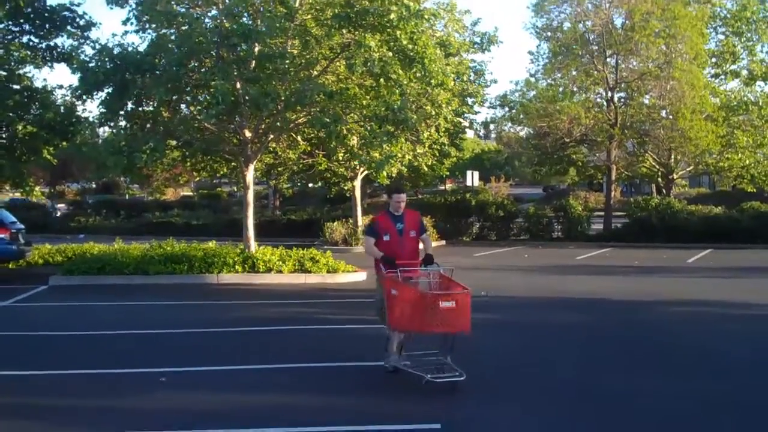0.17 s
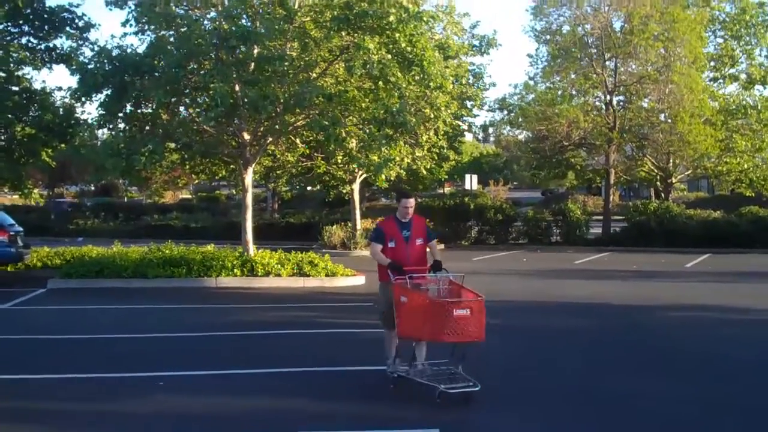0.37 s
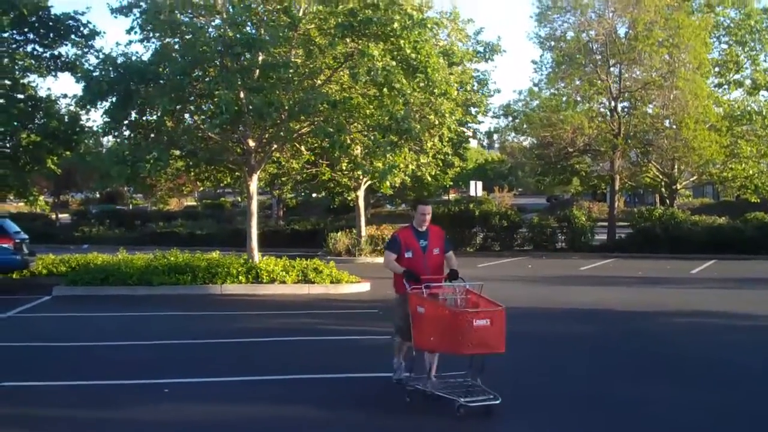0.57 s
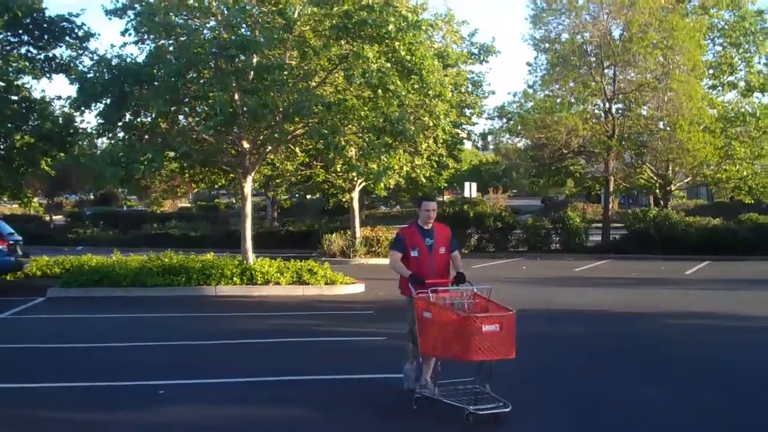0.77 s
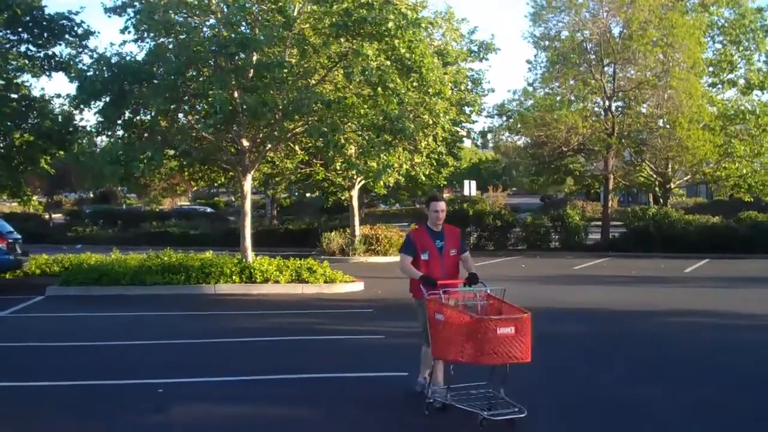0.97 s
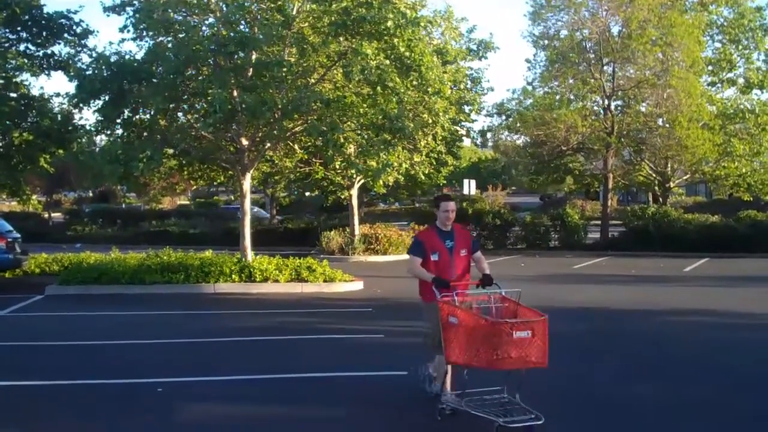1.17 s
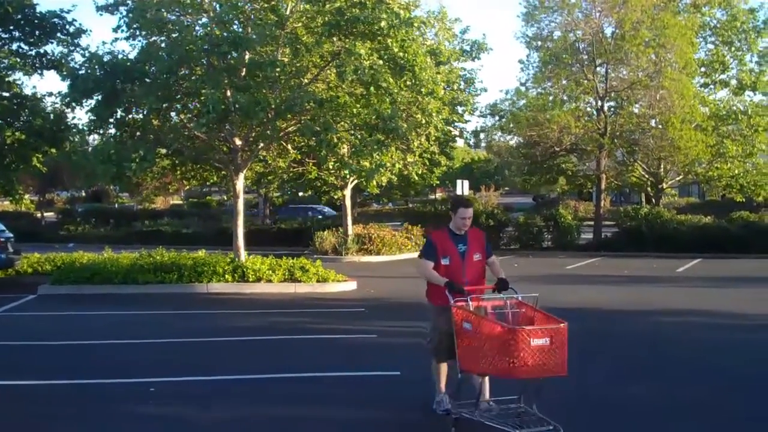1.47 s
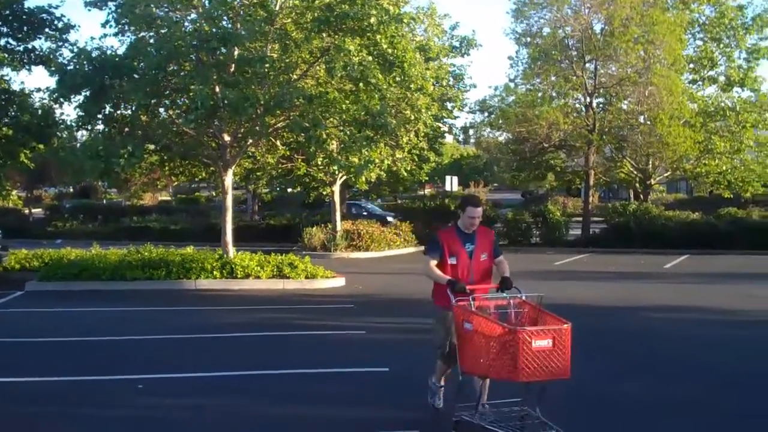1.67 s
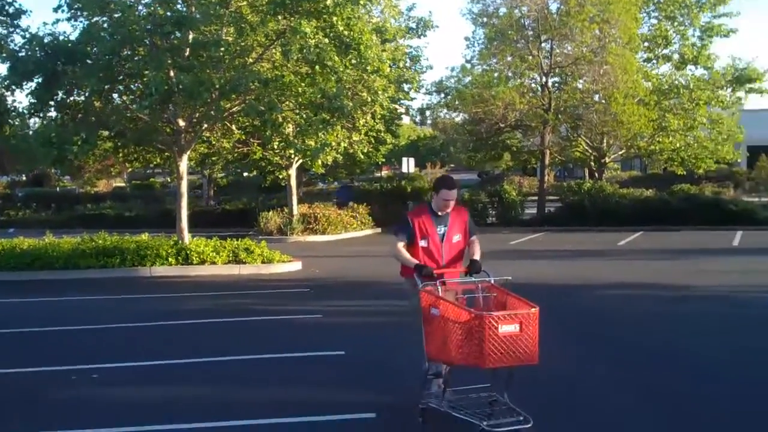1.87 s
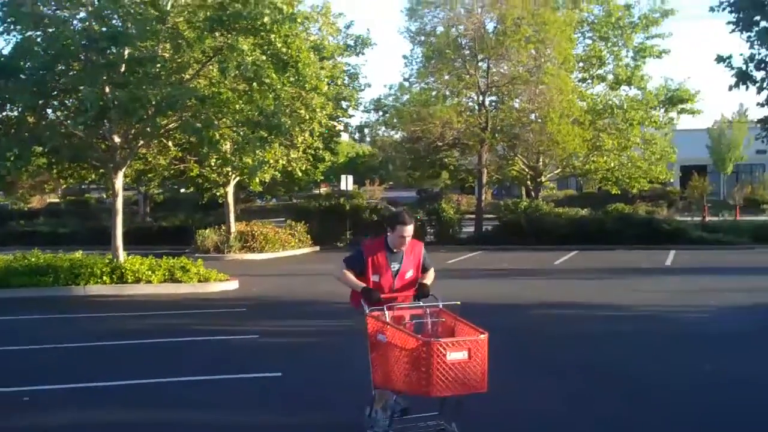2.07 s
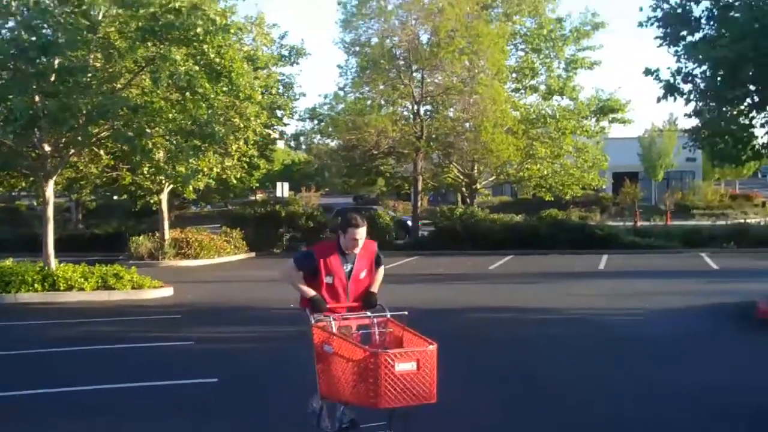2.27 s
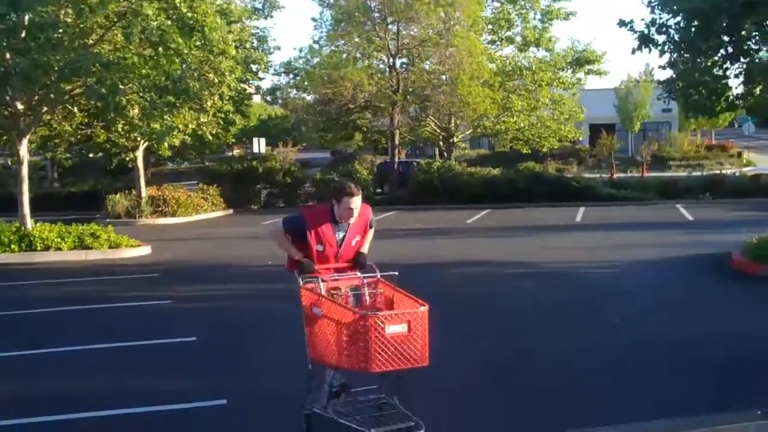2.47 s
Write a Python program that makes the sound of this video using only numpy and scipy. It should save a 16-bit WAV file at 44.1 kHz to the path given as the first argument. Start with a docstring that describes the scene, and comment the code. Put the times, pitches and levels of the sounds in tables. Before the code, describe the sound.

A shopping cart rolls over coarse asphalt in an open parking lot, a few metres away, its loose metal frame rattling throughout in dense, irregular bright bursts, about 25 to 30 jolts a second. Wheels drone over low distant traffic. A faint wavering engine hum dies by 1.3 s. Small high pings follow from 1.2 s, a sharp snap at 1.7 s, and a hollow wheel roar swells, peaking near 2.2 s.

```python
"""A shopping cart rolls over coarse asphalt in an open parking lot, a few metres away.
Throughout, traffic rumbles and the hard wheels drone (coloured noise), and bumps jolt the loose wire
frame into bursts of tiny clashes (short random rings, frame modes, one clear ring and tick per bump).
A wavering engine hum (sine) comes and goes, then dies away by 1.3 s; dry snaps (blips) start at 0.1 s.
From 1.2 s small bright pings join and a hollow wheel roar (noise) swells, strongest near 2.2 s."""
import sys
import numpy as np
from scipy import signal
from scipy.fft import rfft, irfft
from scipy.io import wavfile
from scipy.ndimage import uniform_filter1d

SR = 44100
rng = np.random.default_rng(int(sys.argv[2]) if len(sys.argv) > 2 else 0)


def wrap_up_sound(samples):
    """Save the sound to the file named by the first command line argument, as 16-bit audio."""
    columns = np.atleast_2d(samples).T
    # keep every value between -1 and 1, then stretch to whole-number steps
    tamed = np.clip(columns, -1, 1)
    steps = np.round(tamed * 32767).astype(np.int16)
    wavfile.write(sys.argv[1], SR, steps)


def rack_gain(trim_db):
    """Turn a fader trim in dB into the linear factor to multiply a signal by."""
    fader = np.asarray(trim_db, float)
    return 10 ** (fader / 20)


N = 115983

# bumps that shake the frame: t/s, shaking level/dB, f of the wire that rings most/Hz, hold/s, decay t60/s
JOLTS = [(0.0004, -33, 3630, 0.03, 0.31), (0.021, -23.5, 2900, 0, 0.057), (0.0661, -31.5, 5100, 0, 0.036),
         (0.1, -30, 4600, 0.0055, 0.15), (0.1402, -32.5, 4800, 0, 0.23), (0.1813, -33, 5310, 0.0, 0.027),
         (0.207, -34, 4600, 0.0052, 0.033), (0.2218, -26, 5480, 0.0, 0.21),
         (0.2415, -29.5, 3770, 0.006, 0.036), (0.274, -35, 5340, 0.0067, 0.103),
         (0.2936, -29.5, 3500, 0.0035, 0.15), (0.3271, -36, 2780, 0.013, 0.4),
         (0.3693, -29.5, 3640, 0.0044, 0.11), (0.3947, -29.5, 3330, 0.007, 0.026),
         (0.4125, -28, 3520, 0.0041, 0.15), (0.4503, -27.5, 3700, 0.0026, 0.18),
         (0.473, -34.5, 3610, 0.027, 0.124), (0.497, -32.5, 3550, 0.025, 0.085),
         (0.5773, -30.0, 3830, 0.014, 0.054), (0.6203, -29.5, 3440, 0.0029, 0.29),
         (0.6652, -32.0, 3680, 0.003, 0.051), (0.7026, -36.5, 2630, 0.021, 0.382),
         (0.7413, -31, 4900, 0.0, 0.11), (0.7731, -31.5, 3640, 0.0018, 0.55), (0.8119, -26, 3780, 0, 0.075),
         (0.8384, -23.5, 3530, 0.0017, 0.11), (0.858, -32, 3410, 0.0052, 0.12),
         (0.8767, -28.5, 3650, 0, 0.049), (0.933, -28, 3180, 0.0031, 0.068),
         (0.9524, -26.5, 3530, 0.00027, 0.22), (0.9893, -39, 3360, 0.0, 0.035),
         (1.0257, -26, 3630, 0.0094, 0.067), (1.041, -28.5, 3600, 0.019, 0.084),
         (1.0825, -40, 4500, 0.0036, 0.029), (1.131, -25.5, 3630, 0, 0.14),
         (1.1752, -24.5, 3750, 0.0, 0.13), (1.2118, -31.5, 2930, 0.004, 0.068),
         (1.237, -33, 3080, 0.008, 0.105), (1.2645, -26.5, 3750, 0.0066, 0.15),
         (1.3246, -30.5, 5010, 0.0044, 0.068), (1.342, -29, 3770, 0.000017, 0.1),
         (1.3723, -32, 3940, 0.0, 0.24), (1.4131, -25, 5150, 0.00027, 0.02),
         (1.4245, -26, 2740, 0.0, 0.024), (1.4646, -30, 5040, 0.00061, 0.034),
         (1.49, -29.5, 5490, 0.0012, 0.2), (1.5184, -27, 3980, 0.0029, 0.021),
         (1.5322, -26.5, 3570, 0.0028, 0.13), (1.569, -33.5, 2570, 0.0039, 0.13),
         (1.5975, -34, 2500, 0.019, 0.19), (1.646, -32.5, 5270, 0.0028, 0.2),
         (1.6865, -28.5, 2600, 0, 0.22), (1.743, -25.5, 5850, 0, 0.14), (1.7797, -28.5, 3090, 0.0041, 0.16),
         (1.813, -34.0, 4000, 0.0099, 0.042), (1.8476, -32.5, 6400, 0.021, 0.1),
         (1.8625, -22.5, 2410, 0.00089, 0.15), (1.922, -36.5, 3460, 0.0028, 0.028),
         (1.983, -36.5, 2320, 0.014, 0.11), (2.03, -35.5, 2520, 0.015, 0.131),
         (2.051, -32.5, 3900, 0, 0.29), (2.0885, -31.5, 4170, 0.0096, 0.059),
         (2.1126, -32.5, 3530, 0.0071, 0.19), (2.166, -35.5, 4320, 0.034, 0.039),
         (2.198, -31.5, 2500, 0.0, 0.03), (2.2151, -36, 2800, 0.0012, 0.15),
         (2.235, -33.5, 3110, 0.016, 0.031), (2.28, -36.5, 4400, 0.001, 0.11),
         (2.301, -27.5, 4020, 0.008, 0.068), (2.3502, -29.5, 3180, 0.0, 0.046),
         (2.401, -35, 2870, 0.0028, 0.037), (2.519, -30.5, 5420, 0.0063, 0.13),
         (2.542, -37.5, 3740, 0.027, 0.034), (2.5831, -34.5, 5340, 0.0069, 0.13)]
JOLT_RISE_S = 0.0026


def evened(x):
    """Scales to unit rms."""
    return x / np.sqrt(np.mean(x ** 2) + 1e-20)


def curve(rows):
    """Amplitude over time from (t/s, level/dB) rows."""
    s, db = np.transpose(rows)
    return rack_gain(np.interp(np.arange(N) / SR, s, db))


def coloured(x, points, power=1):
    """Filters by (f/Hz, gain/dB) rows, interpolated over log f; power scales the dB."""
    f, db = np.transpose(points)
    hz = np.fft.rfftfreq(x.shape[-1], 1 / SR)
    gain_db = power * np.interp(np.log(hz + 1), np.log(f + 1), db)
    return irfft(rfft(x) * rack_gain(gain_db), x.shape[-1])


def add(mix, s, sound):
    """Adds sound into mix in place from time s, cut at the end."""
    part = mix[max(round(s * SR), 0):][:len(sound)]
    part += sound[:len(part)]


def ring(hz, t60, size=3000):
    """Exponentially decaying sine, as of one struck mode."""
    t = np.arange(size) / SR
    return rack_gain(-60 * t / max(t60, 1e-3)) * np.sin(2 * np.pi * hz * t)


def noise_layer(level, band):
    """Two unrelated draws of coloured noise (centre and spread) under one level curve."""
    return curve(level) * evened(coloured(rng.standard_normal((2, N)), band))


def traffic_rumble():
    """Distant traffic: mostly low noise with a slowly drifting level."""
    # t/s, level/dB
    rumble_level = [(0.0, -39), (0.59, -39.5), (0.75, -38), (1.11, -42.5), (1.13, -39), (1.6, -41.5),
                    (1.94, -41), (1.98, -44), (2.03, -41.5), (2.63, -42.5)]
    # f/Hz, density/dB
    traffic_band = [(15, -23), (30, -10.5), (50, -10), (70, 1), (82, -3), (130, -5), (200, -2.5),
                    (240, -6.5), (262, -2), (300, -13), (400, -13.5), (550, -20), (1500, -47), (14000, -90)]
    return noise_layer(rumble_level, traffic_band)


def engine_hum():
    """Engine tone: a sine whose pitch wavers at random, slower than 6 Hz."""
    # t/s, rms level/dB
    hum_level = [(0, -40), (.36, -38.5), (.46, -43), (.58, -60), (.69, -58), (.74, -43), (.8, -54),
                 (.87, -43), (.95, -58), (1.23, -48), (1.32, -75), (2.63, -80)]
    centre_hz, waver_rms_hz = 113, .8
    hz = np.fft.rfftfreq(N, 1 / SR)
    waver = irfft(rfft(rng.standard_normal(N)) * (hz < 6), N)
    pitch_hz = centre_hz + waver_rms_hz * evened(waver)
    return np.sqrt(2) * curve(hum_level) * np.sin(2 * np.pi * np.cumsum(pitch_hz) / SR)


def wheel_drone():
    """Hard wheels on asphalt: broad mid-range noise."""
    # t/s, level/dB
    drone_level = [(0.0, -45), (0.02, -41), (0.64, -41.5), (1.08, -38), (1.11, -39.5), (1.71, -40),
                   (2.02, -35.5), (2.13, -40), (2.15, -36.5), (2.55, -39), (2.62, -42), (2.63, -33)]
    # f/Hz, density/dB
    tread_band = [(250, -8), (400, -7), (560, -8), (660, -2), (730, -4.5), (1000, 2.5), (1250, -2),
                  (1700, -1), (2500, -7.5), (5000, -26), (9000, -40), (14000, -70)]
    return noise_layer(drone_level, tread_band)


def hollow_roar():
    """Hollow roar of the nearing wheels: noise with peaks and dips, 400-950 Hz."""
    # t/s, level/dB
    roar_level = [(1.2, -56.5), (1.7, -52.5), (2.0, -45), (2.2, -36), (2.28, -38), (2.36, -40.5),
                  (2.63, -39.5)]
    # f/Hz, density/dB
    roar_band = [(200, -19), (400, -2.5), (560, -7.5), (650, 3), (730, -8.5), (830, 2.5), (950, -1.5),
                 (1150, -7.5), (1600, -16), (6000, -42), (14000, -80)]
    return noise_layer([(0, -65)] + list(roar_level), roar_band)


def blip(hz, t, width_s):
    """Cosine under a Gaussian."""
    return np.exp(-(t / width_s) ** 2) * np.cos(2 * np.pi * hz * t)


def snaps():
    """Very short dry clicks: a low blip with a shorter, brighter one slightly first."""
    # t/s, level/dB, low f/Hz, high f/Hz, left minus right/dB
    snap_rows = [(.1012, -18, 4700, 8000, 1), (.1828, -18.5, 5000, 8500, 1), (.2102, -21, 4600, 8000, 1),
                 (1.7252, -9.5, 3700, 7600, -4), (2.2528, -19, 3200, 6000, 1),
                 (2.3218, -15.5, 3600, 6500, 1), (2.4086, -20, 2900, 6000, 1)]
    width_s, high_db, lead_s = .0003, -6, .00045
    out, t = np.zeros((2, N)), np.arange(-100, 100) / SR
    for s, db, low_hz, high_hz, pan_db in snap_rows:
        click = blip(low_hz, t, width_s)
        click = click + rack_gain(high_db) * blip(high_hz, t + lead_s, width_s / 3)
        for side, sign in enumerate((.5, -.5)):
            add(out[side], s + t[0], rack_gain(db + sign * pan_db) * click)
    return out


def rings():
    """Each bump ticks and rings one wire clearly; a few small high pings join."""
    # t/s, level/dB, f/Hz, t60/s
    ping_rows = [(1.1972, -27, 10300, 0.014), (1.3548, -22.5, 10800, 0.017), (1.7679, -34, 10900, 0.024),
                 (2.1011, -27.5, 11000, 0.02)]
    ring_db, ring_t60_s = -3, 0.05
    tick_db, tick_t60_s = 1.5, 0.0038  # first contact
    out, rise = np.zeros(N), np.minimum(np.arange(3000) / SR / JOLT_RISE_S, 1)
    for s, db, hz, hold_s, t60_s in JOLTS:
        add(out, s, rack_gain(db + ring_db) * ring(hz, ring_t60_s) * rise)
        add(out, s + JOLT_RISE_S / 2, rack_gain(db + tick_db) * ring(hz, tick_t60_s))
    for s, db, hz, t60_s in ping_rows:
        add(out, s, rack_gain(db) * ring(hz, t60_s) * rise)
    return out


def shaking():
    """How hard the frame shakes: chatter plus rise, hold and decay of every bump, in uneven clumps."""
    # chatter between bumps: t/s, level/dB
    jitter_level = [(0.0, -39), (0.29, -40), (0.58, -38.5), (0.88, -36.6), (1.17, -40.5), (1.46, -37.5),
                    (1.75, -43), (2.05, -43.5), (2.34, -39.5), (2.63, -40.5)]
    clump_db, clump_s = 1.7, 0.0021
    power, t = curve(jitter_level) ** 2, np.arange(SR // 3) / SR
    for s, db, hz, hold_s, t60_s in JOLTS:
        fall_db = -60 * np.maximum(t - JOLT_RISE_S - hold_s, 0) / max(t60_s, .005)
        bump = np.minimum(t / JOLT_RISE_S, 1) * rack_gain(db + fall_db)
        add(power, s, bump ** 2)
    clumps = rng.standard_normal(N)
    for _ in range(2):
        clumps = uniform_filter1d(clumps, round(clump_s * SR))
    return np.sqrt(power) * evened(rack_gain(clump_db * evened(clumps)))


def wire_clashes(drive, strikes, pick, count):
    """Tiny wire clashes and sizzle, each a short ring at one of count pitches, driven by the shaking."""
    # f/Hz, density/dB
    clash_band = [(530, -40.5), (900, -6), (1020, -7), (1240, -14.5), (1630, -1), (2230, -3), (3640, 0.5),
                  (4690, -2.5), (5260, -1), (8220, -8), (11100, -18), (13900, -34.5)]
    # how steeply each pitch follows the shaking: f/Hz, exponent
    swing = [(1000, 0.52), (2500, 0.89), (5000, 0.98), (9000, 1.33), (14000, 0.59)]
    t60_s, sizzle_db = 0.01, 2
    focus_db, focus_octaves = 4, .3  # louder near the wire that rings most
    s, _, ring_hz, *_ = np.transpose(JOLTS)
    latest = np.searchsorted(s, np.arange(N) / SR) - 1
    focus_hz = ring_hz[np.maximum(latest, 0)]
    pitches_hz = np.linspace(1100, 14000, count) + rng.uniform(-82, 54, count)
    out = np.zeros(N)
    for k, hz in enumerate(pitches_hz):
        push = evened(drive ** np.interp(hz, *np.transpose(swing)))
        push = push * rack_gain(focus_db * np.exp(-(np.log2(hz / focus_hz) / focus_octaves) ** 2))
        sizzle = rack_gain(sizzle_db) * rng.standard_normal(N) / np.sqrt(count)
        hits = strikes * (pick == k) + sizzle
        out += signal.oaconvolve(push * hits, ring(hz, t60_s, size=1024))[:N]
    return evened(coloured(out, clash_band))


def frame_modes(drive, strikes, pick):
    """Modes of the wire frame, each rung by its share of the strikes."""
    # f/Hz, relative level/dB, t60/s
    mode_rows = [(1693, -1, 0.12), (2504, 3.5, 0.053), (3052, 6, 0.062), (3123, 5.5, 0.017),
                 (3550, -6, 0.071), (3690, 0, 0.043), (3834, 2.5, 0.096), (4274, 2.5, 0.13),
                 (5500, -17, 0.067), (5560, 2, .05), (5880, 10, 0.036), (7021, 4, 0.09), (8071, -14, .04),
                 (8330, 10, 0.032)]
    out = np.zeros(N)
    for k, (hz, db, t60_s) in enumerate(mode_rows):
        hits = strikes * drive * (pick % len(mode_rows) == k)
        out += rack_gain(db) * signal.oaconvolve(hits, ring(hz, t60_s))[:N]
    return evened(out)


def rattle(count=56):
    """Random strikes of random size set off both wire clashes and frame modes, following the shaking."""
    clashes_per_s, spread_db, modes_db = 4000, 3, -15
    drive = shaking()
    size = rack_gain(spread_db * np.minimum(rng.exponential(1, N), 4))
    strikes = size * (rng.random(N) < clashes_per_s / SR)
    strikes = evened(strikes * rng.choice([-1., 1.], N))
    pick = rng.integers(0, count, N)  # which pitch is struck
    level = np.sqrt(np.mean(drive ** 2))
    clashes = wire_clashes(drive, strikes, pick, count)
    return level * (clashes + rack_gain(modes_db) * frame_modes(drive, strikes, pick))


def scatter(x, t60_s):
    """Sparse random reflections off ground and cars, energy 1."""
    taps = rng.choice([-1., 1.], 8000) * (rng.random(8000) < .05)
    taps = taps * rack_gain(-60 * np.arange(8000) / SR / t60_s)
    return signal.oaconvolve(x, taps / np.linalg.norm(taps))[:N]


def scene():
    """The frame is wide: a second, independent rattle feeds the side signal of the stereo pair."""
    # f/Hz, side gain/dB
    side_gain = [(60, -21), (150, -25), (360, -17), (900, -14.5), (2220, -11.5), (5470, -9.5), (9000, -9),
                 (13500, -8)]
    # f/Hz, left minus right/dB
    lean = [(60, 1.5), (230, 1.5), (900, 2), (3480, 1.0), (13500, 0.5)]
    echo_db, echo_t60_s = -12, 0.16
    centre, spread = wheel_drone() + traffic_rumble() + hollow_roar()
    cart = rattle() + rings()
    mid = cart + rack_gain(echo_db) * scatter(cart, echo_t60_s) + centre + engine_hum()
    side = coloured(rattle() + spread, side_gain)
    left = coloured(mid + side, lean, .5)
    right = coloured(mid - side, lean, -.5)
    return np.array([left, right]) + snaps()


def top_cut(x):
    """Nothing passes above the cut-off."""
    return signal.sosfilt(signal.butter(12, 14100, fs=SR, output="sos"), x)


def record(dry):
    """Returns the finished stereo mix."""
    return top_cut(dry)


dry = scene()
out = record(dry)
wrap_up_sound(out)
```